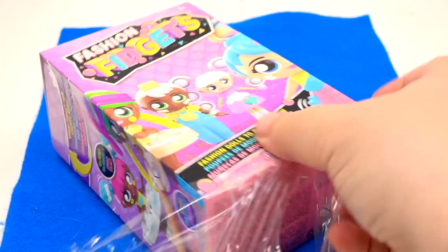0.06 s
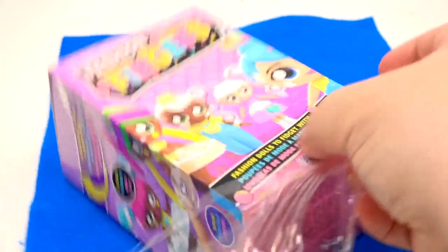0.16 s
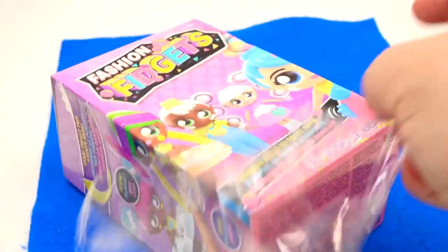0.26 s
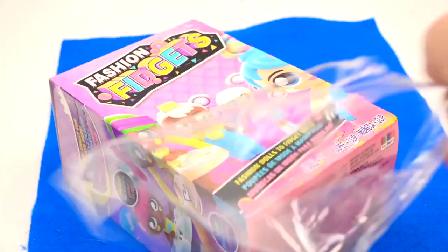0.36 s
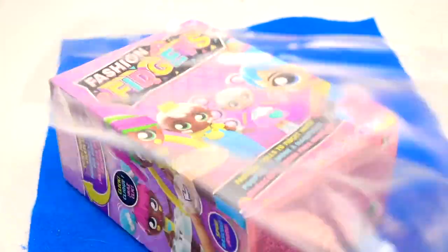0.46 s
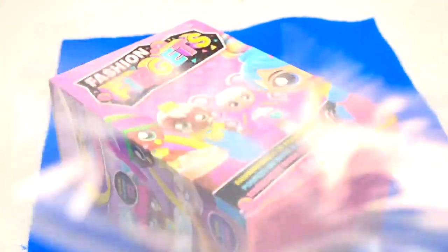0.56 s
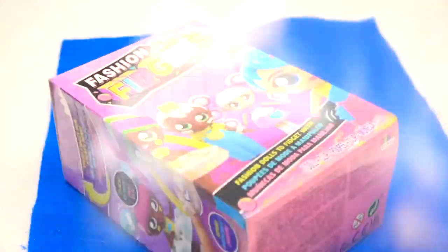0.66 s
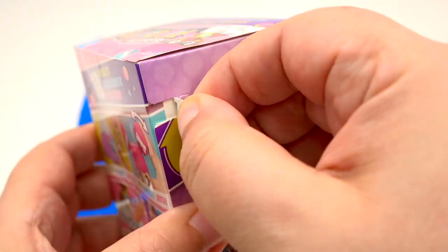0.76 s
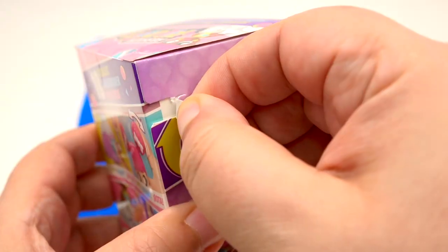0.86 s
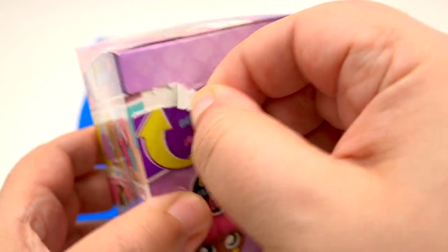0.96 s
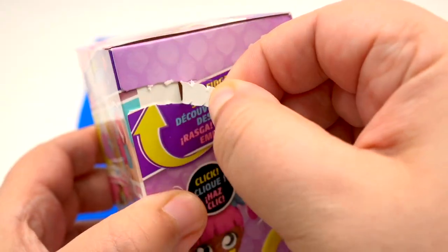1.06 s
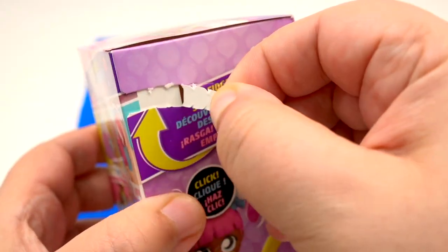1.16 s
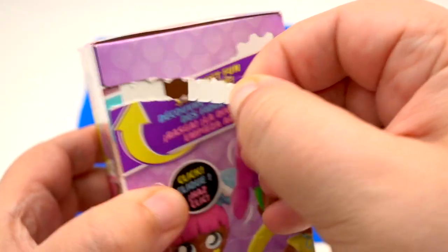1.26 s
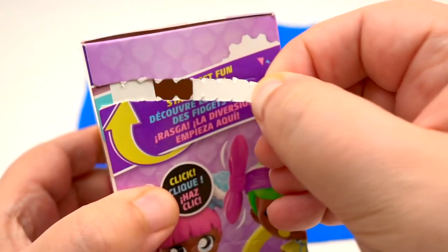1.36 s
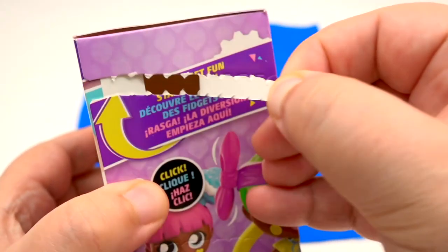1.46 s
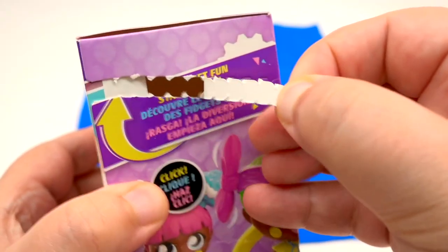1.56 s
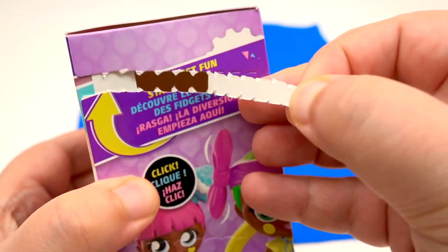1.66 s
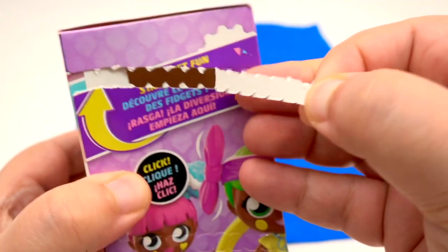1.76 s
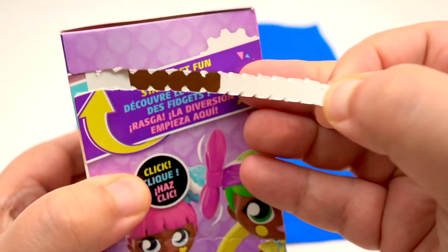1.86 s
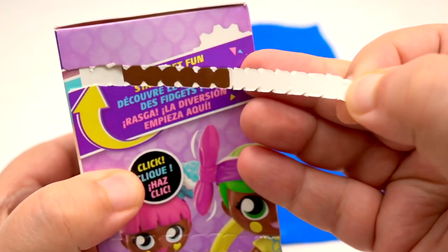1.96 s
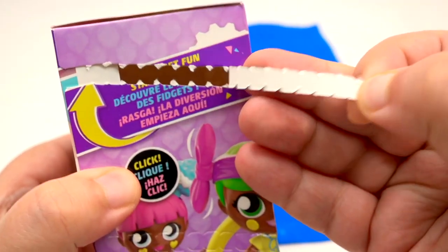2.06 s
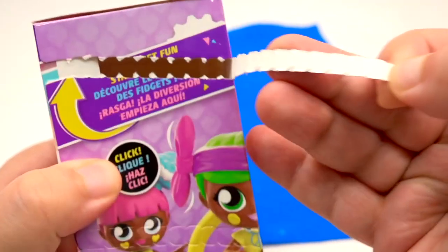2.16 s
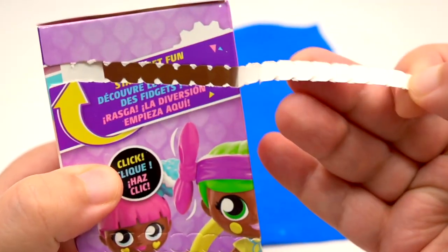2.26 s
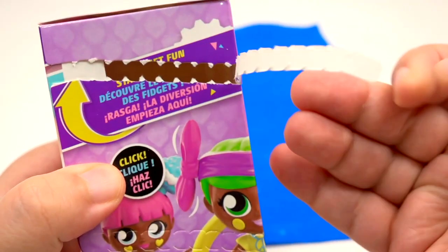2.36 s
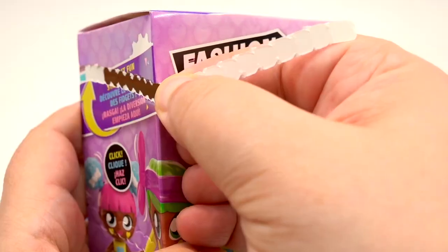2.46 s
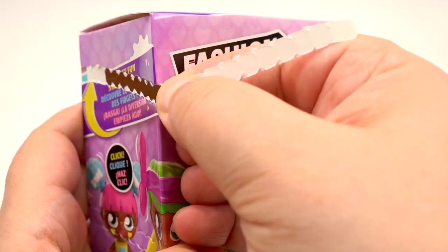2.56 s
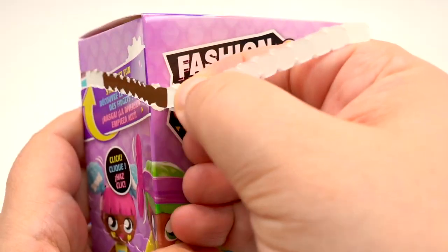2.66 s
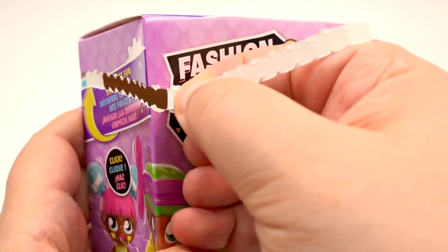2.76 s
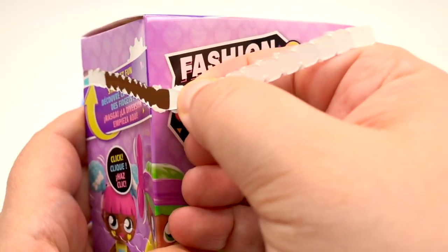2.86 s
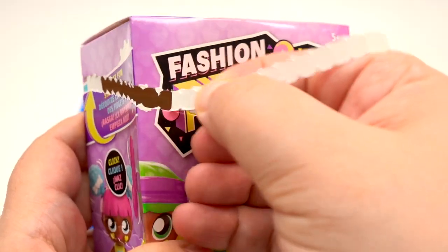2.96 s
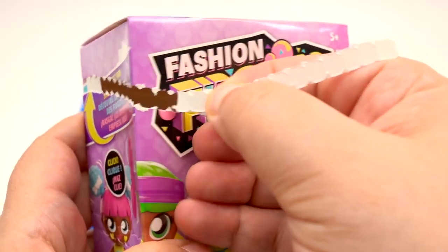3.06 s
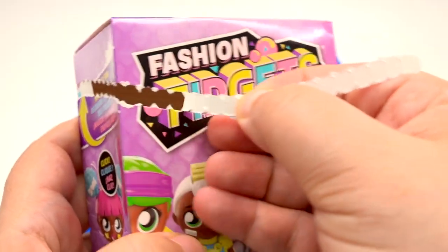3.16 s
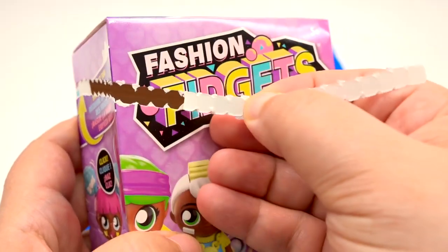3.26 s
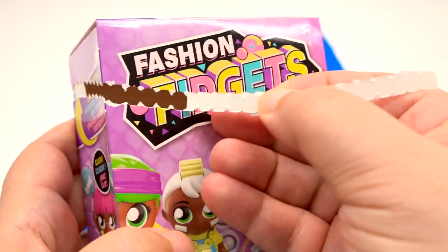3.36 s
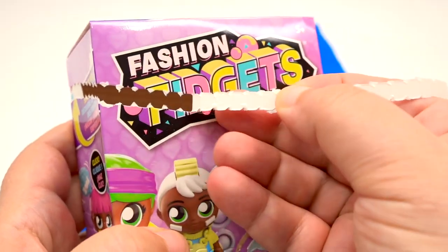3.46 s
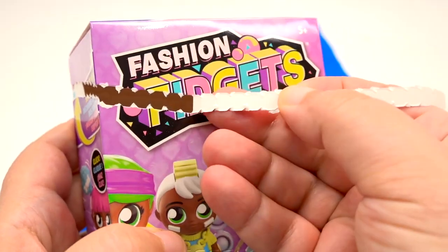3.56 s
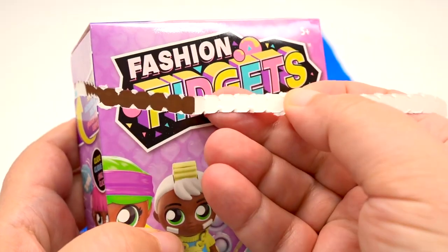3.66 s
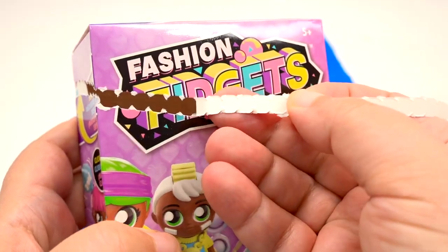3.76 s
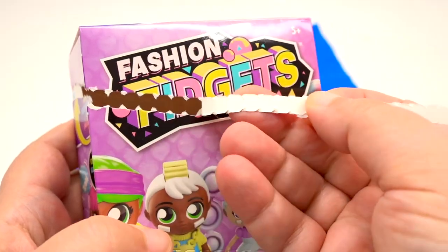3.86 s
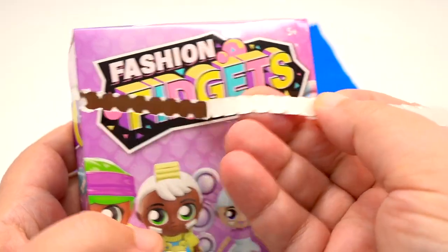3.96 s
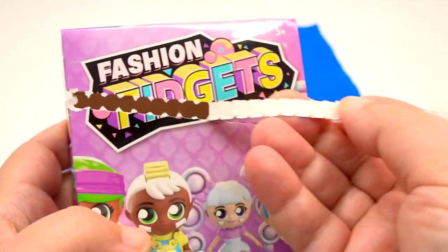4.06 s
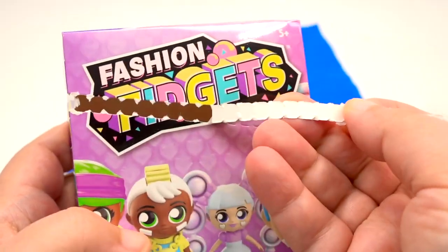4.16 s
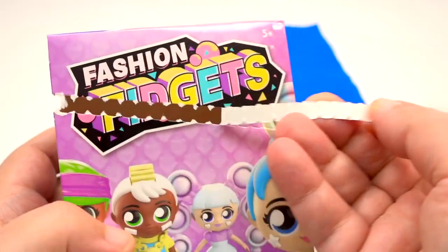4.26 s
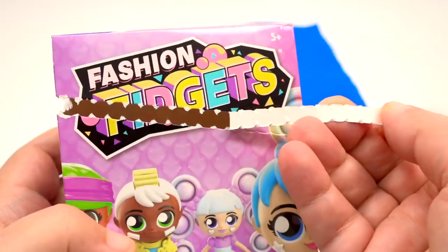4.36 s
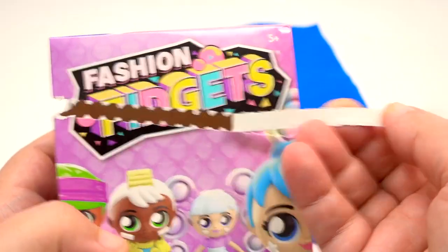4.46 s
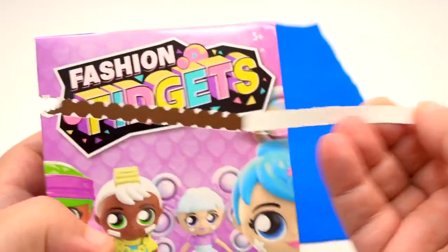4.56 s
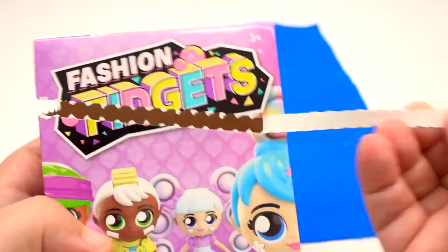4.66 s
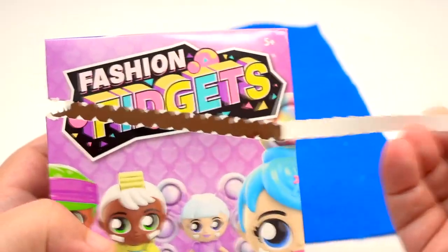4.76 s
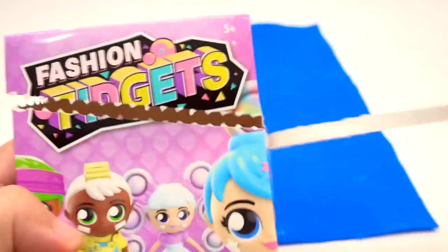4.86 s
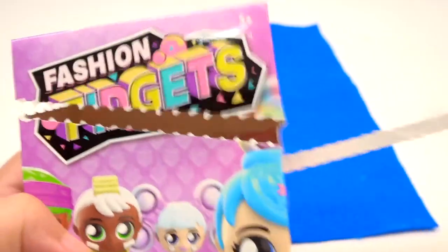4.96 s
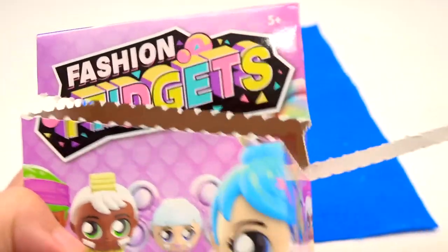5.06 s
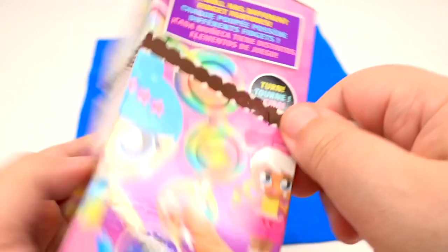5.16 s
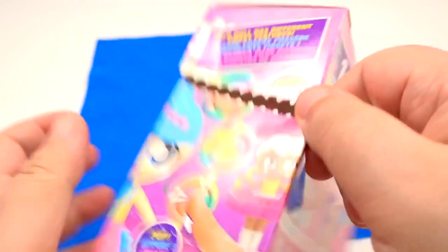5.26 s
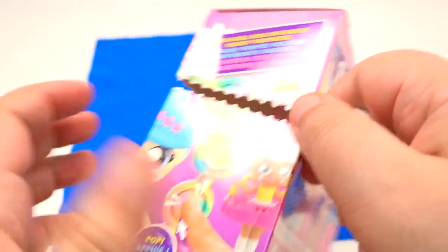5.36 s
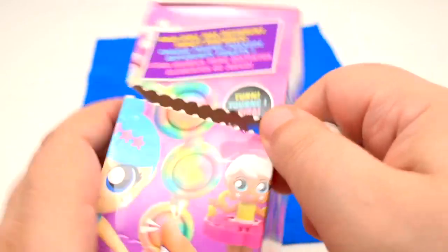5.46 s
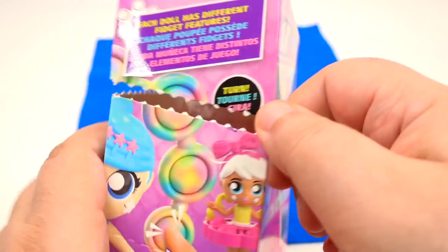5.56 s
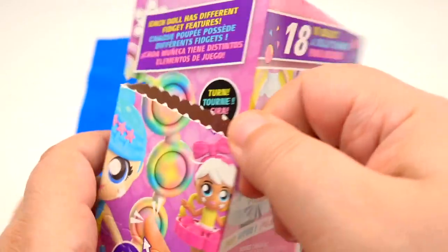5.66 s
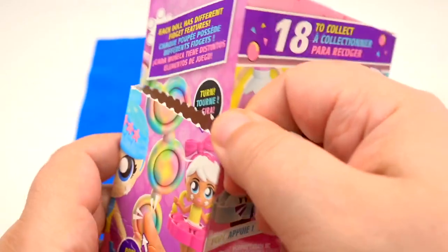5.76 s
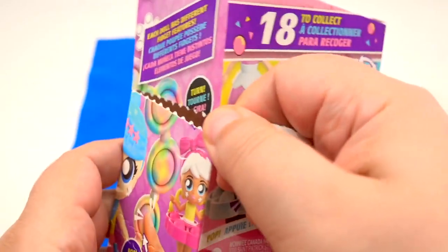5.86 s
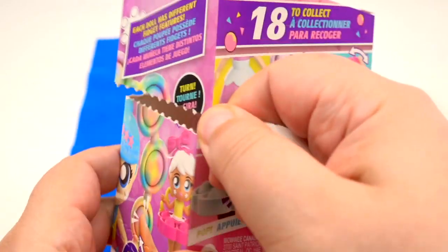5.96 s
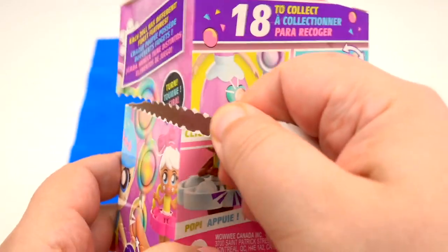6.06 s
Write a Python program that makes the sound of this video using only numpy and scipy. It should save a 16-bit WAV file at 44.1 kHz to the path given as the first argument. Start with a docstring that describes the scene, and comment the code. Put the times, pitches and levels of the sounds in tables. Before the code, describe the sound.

Heard up close in a small room, hands tug crackly plastic film off a little cardboard box and pull its tear strip. The perforations break one by one with dry, hollow snaps, pause, rip through a corner, then carry on and speed up in a final burst. A dull knock from the loosened lid, light scraping and a few last snaps follow, over faint handling noise.

```python
"""A perforated tear strip is peeled off a small cardboard box, close up, after its thin plastic wrap.
Each paper bridge breaks with a crack that rings the card walls and the hollow inside, the more so
where the card gives; fibres crackle in between. The last stretch goes in one quick run, and the loose
top knocks and is bent open. A small room answers, and a limiter flattens the loudest cracks."""
import sys
import numpy as np
from scipy import signal
from scipy.fft import rfft, irfft, next_fast_len
from scipy.io import wavfile
from scipy.ndimage import uniform_filter1d, minimum_filter1d, map_coordinates

SR = 44100
rng = np.random.default_rng(int(sys.argv[2]) if len(sys.argv) > 2 else 0)


def unload_audio(sound):
    """Save the sound as a 16-bit wav file, at the path given as the first command line argument."""
    columns = np.transpose(np.atleast_2d(sound))
    # keep every value between -1 and 1, then stretch to whole-number steps
    steps = np.round(np.clip(columns, -1, 1) * 32767)
    wavfile.write(sys.argv[1], SR, steps.astype(np.int16))


N = 269892
TIME = np.arange(N) / SR
HIT_TIME = np.arange(SR // 5) / SR  # seconds into a single hit

# Tone curves. Each row: frequency in Hz, gain in dB.
ROOM_TONE_EQ = [(25, -45), (60, 2.5), (130, 5), (400, -10), (1000, -5), (3000, -32), (16000, -56)]
HANDS_EQ = [(40, -20.5), (90, -15), (130, 4), (180, -8), (330, -9), (900, -37), (3000, -41.5)]
FILM_EQ = [(59, -46), (229, -13.5), (524, -8.5), (1150, -6), (3800, -1.5), (5400, -0.5), (8500, -9),
           (13500, -21), (16000, -22)]
SOFT_TOUCH_EQ = [(500, 3.5), (1500, 1.5), (6000, -16), (16000, -40)]
CRACK_EQ = [(200, -12), (1000, -15), (1700, -12), (2400, -1), (4000, 5), (6000, 0.5), (8800, -3.5),
            (10800, -18), (16000, -22)]
FIBRE_EQ = [(80, -4), (300, 7.5), (900, 7.5), (5000, -2), (8500, -8.5), (10800, -16), (16000, -22)]
CORNER_EQ = [(100, -29), (300, 6.5), (700, -2), (2300, 2.5), (8800, -8.5), (11000, -26), (16000, -24)]
PLIES_EQ = [(200, -5.5), (1500, 3.5), (3000, -8), (5300, -1), (9000, -12.5), (11000, -19), (16000, -27)]
REVERB_EQ = [(60, -14.5), (200, -6.5), (900, -7.5), (3000, -5), (12000, -5.5)]
STEREO_SIDE_EQ = [(40, -26), (200, -16), (1200, -29), (3600, -47), (5800, -21.5), (8200, -2), (10000, 1),
                  (14000, -15)]

# Tugs that slide the wrap off. Each row: start and end in seconds, crinkle level in dB.
WRAP_TUGS = [(0.038, 0.05, -25.5), (0.1, 0.14, -38), (0.18, 0.47, -32), (0.393, 0.413, -26),
             (0.622, 0.648, -24.5)]
# The wrap buckling. Each row: time in seconds, level in dB.
WRAP_POPS = [(0.0246, -12), (0.041, -8), (0.0981, -19), (0.1698, -12.5), (0.2426, -9), (0.297, -11),
             (0.461, -25), (0.484, -8.5), (0.604, -8), (0.618, -3.5), (0.6345, -3), (0.718, -16)]
# Fingers bumping the box. Each row: time in seconds, level in dB.
FINGER_BUMPS = [(0.172, -34), (0.604, -24), (2.143, -20.5), (2.3049, -29), (4.696, -18.5), (5.654, -22.5)]
# Bridges breaking and creases giving way. Each row: time in seconds, crack, hollow and wall levels in dB.
CARD_SNAPS = [(0.797, -16.5, -40, -19.5), (0.909, -19, -25, -12), (0.9502, -13.5, -17.5, -17),
              (1.146, -31, -40, -32), (1.1951, -13.5, -18, -15.5), (1.2609, -14, -20, -18.5),
              (1.4162, -16.5, -12, -10), (1.4287, -18.5, -25, -20), (1.5672, -12, -14, -17.5),
              (1.7161, -14, -15, -9), (1.8445, -26.5, -38, -37), (1.8826, -13, -18, -9.5),
              (1.9883, -22, -45, -31), (2.042, -14.5, -12, -12), (2.055, -15, -15, -12),
              (2.0899, -17, -10, -13.5), (2.1027, -16, -10.5, -17), (2.87, -34.5, -42, -32),
              (2.916, -23, -40, -16.5), (2.9298, -13, -24, -12.5), (3.021, -16, -24.5, -20),
              (3.055, -18, -39, -11.5), (3.0629, -21.5, -38, -22), (3.1364, -11, -15.5, -6),
              (3.1928, -22.5, -34, -22), (3.288, -13, -18.5, -5.5), (3.375, -16, -25, -11),
              (3.745, -18.5, -21, -15.5), (3.775, -12.5, -8, -9), (3.9515, -15.5, -14, -14),
              (3.9782, -14.5, -16.5, -17), (3.997, -16, -9, -15.5), (4.167, -20.5, -20, -11),
              (4.1814, -21, -12, -16), (4.2105, -16.5, -37, -20), (4.2291, -18.5, -16, -12),
              (4.3073, -17, -21.5, -15), (4.468, -16.5, -18, -7.5), (4.5114, -25, -14.5, -18),
              (4.5214, -19, -13, -7), (4.5639, -12, -14.5, -5), (4.622, -20.5, -16, -13.5),
              (4.65, -17.5, -37, -16), (4.7331, -17.5, -11, -8.5), (4.767, -19.5, -17.5, -21),
              (4.782, -14.5, -14.5, -10), (4.799, -17, -19, -13), (4.807, -18, -26, -2.5),
              (4.821, -17, -11.5, -9), (4.854, -19, -6, -3.5), (4.866, -12.5, -8, -3.5),
              (4.885, -26, -7, -8), (4.912, -13.5, -14, -6), (4.923, -20, -15, -7),
              (4.935, -15, -15.5, -5.5), (5.9286, -19, -27, -18), (5.9785, -10.5, -26, -11.5),
              (6.055, -18, -43, -16.5)]
# Short rips and scrapes. Each row: peak time in seconds, level in dB, decay in seconds.
CARD_RIPS = [(0.942, -27, 0.005), (3.753, -31, 0.012), (5.114, -38.5, 0.053), (5.476, -29, 0.035),
             (5.677, -40.5, 0.027), (6.044, -29, 0.0083)]
# Steady pulls on the card. Each row: start and end in seconds, crackle level in dB.
CARD_PULLS = [(1.2, 2.1, -48), (3.55, 4.95, -54.5), (5.5, 6.1, -57)]

# The box rings higher near a corner, lower mid-face. Each row: time in seconds, hollow and wall pitch in Hz.
BOX_PITCHES = [(2.055, 343, 890), (2.091, 446, 943), (3.38, 487, 886), (3.76, 256, 988), (4.2, 245, 1020),
               (4.3, 244, 893), (4.47, 250, 900), (4.548, 298, 760), (4.73, 317, 995), (4.9, 287, 936),
               (5.7, 247, 1022)]
# The hollow and the stiffer walls. Each row: multiple of the main pitch, level in dB, t60 in seconds.
HOLLOW_MODES = [(0.66, -7, 0.061), (1, -0.5, 0.059), (1.38, -6, 0.062), (1.85, -9, 0.03)]
WALL_MODES = [(0.85, -7.5, 0.042), (1, 0, 0.042), (1.12, -7.5, 0.028), (1.38, -7, 0.025),
              (1.52, -3.5, 0.039), (1.78, -2.5, 0.017)]
# The loose strip and the loose top. Each row: frequency in Hz, level in dB, t60 in seconds.
STRIP_MODES = [(1670, -4.9, 0.014), (2340, 2.5, 0.016), (3290, -0.5, 0.016)]
LID_MODES = [(248, -4.5, 0.057), (404, -0.5, 0.038), (490, 2, 0.026), (617, -5, 0.022), (878, -2, 0.021)]
# The room's tail. Each row: frequency in Hz, t60 in seconds.
ROOM_DECAY = [(1000, 0.26), (7000, 0.28)]
# Stereo balance. Each row: frequency in Hz, left minus right in dB.
LEFT_LEAN = [(600, 2), (1200, -0.3), (8000, 0.6)]


def amp(db):
    """Decibels to linear gain."""
    return 10 ** (np.asarray(db) / 20)


def unit(x):
    """Scale to an rms of 1."""
    return x / np.sqrt(np.mean(x ** 2) + 1e-20)


def burst(x):
    """Scale a hit to the energy of one millisecond at full level."""
    return x * np.sqrt(SR / 1000 / np.sum(x ** 2))


def along(points, hz):
    """Read a curve of (Hz, value) points on a log frequency axis."""
    freqs, values = np.transpose(points)
    return np.interp(np.log(hz + 1), np.log(freqs + 1), values)


def add(track, s, sound):
    """Mix a sound into a track at s seconds."""
    part = track[max(round(s * SR), 0):][:len(sound)]
    part += sound[:len(part)]


def colour(x, eq):
    """Minimum-phase EQ: nothing rings ahead of an attack."""
    size = 2 * next_fast_len(len(x) // 2 + 2048)
    gain = amp(along(eq, np.fft.rfftfreq(size, 1 / SR)))
    cepstrum = irfft(np.log(gain))
    cepstrum[1:size // 2] *= 2
    cepstrum[size // 2 + 1:] = 0
    return irfft(rfft(x, size) * np.exp(rfft(cepstrum)), size)[:len(x)]


def wobble(rate):
    """A smooth random curve, rate knots a second."""
    return map_coordinates(rng.standard_normal(2048), [TIME * rate], mode="mirror")


def strokes(rows, attack, release):
    """Envelope of hand movements: each swells, holds from start to end and dies away."""
    envelope = np.zeros(N)
    for start, end, db in rows:
        fade = np.maximum((start - TIME) / attack, (TIME - end) / release)
        envelope += amp(db) * np.exp(-np.maximum(0, fade))
    return envelope


def grains(eq, rate, spread_db):
    """Tiny fractures of uneven size at random times, about rate a second."""
    sizes = amp(spread_db * np.clip(rng.standard_normal(N), -2, 2)) * rng.choice([-1, 1], N)
    return unit(colour(sizes * (rng.random(N) < rate / SR), eq))


def background(room_db=-53, hands_db=-51, lift_s=0.76, resting_db=-9):
    """Steady room tone, and the low shuffle of hands, stronger once they lift the box."""
    room_tone = unit(colour(rng.standard_normal(N), ROOM_TONE_EQ))
    shuffle = unit(colour(rng.standard_normal(N), HANDS_EQ))
    fidget = amp(3 * wobble(11))
    held = amp(np.interp(TIME, [lift_s / 2, lift_s], [resting_db, 0]))
    return amp(room_db) * room_tone + amp(hands_db) * held * fidget * shuffle


def crack(eq, t60, ragged_db):
    """A quick avalanche of fractures that speeds up and stalls within a millisecond."""
    surges = map_coordinates(rng.standard_normal(len(HIT_TIME) // 8), [HIT_TIME * 1500], order=1)
    envelope = amp(ragged_db * surges - 60 * HIT_TIME / t60)
    return burst(colour(rng.standard_normal(len(HIT_TIME)) * envelope, eq))


def plastic_wrap(crinkle_db=-2, pop_db=-6):
    """The film crinkles finely with each tug and now and then buckles with a sharp pop."""
    tugs = strokes(WRAP_TUGS, attack=0.014, release=0.033)
    crinkle = amp(2.6 * wobble(200)) * grains(FILM_EQ, rate=3000, spread_db=5.5)
    out = tugs * amp(crinkle_db) * crinkle
    for s, db in WRAP_POPS:
        add(out, s, amp(db + pop_db) * crack(FILM_EQ, t60=0.023, ragged_db=0.5))
    return out


def flex(x, depth_db):
    """A bending sheet keeps changing colour: gains drift over frequency and time."""
    frames = signal.stft(x, nperseg=256)[2]
    drift = uniform_filter1d(rng.standard_normal(frames.shape), size=6, axis=0)
    drift = uniform_filter1d(drift, size=14, axis=1)
    gain = amp(depth_db * unit(drift))
    gain /= np.sqrt(np.mean(gain ** 2, axis=0))
    return signal.istft(frames * gain, nperseg=256)[1][:N]


def ring(modes, base_hz=1, detune=0.02, scatter_db=4.0):
    """Struck card rings in decaying modes whose pitch and strength vary from hit to hit."""
    ratio, db, t60 = np.transpose(modes)[:, :, None]
    hz = base_hz * ratio
    shift, strength = rng.standard_normal((2, len(modes), 1))
    sign = rng.choice([-1, 1], (len(modes), 1))
    waves = sign * np.sin(2 * np.pi * hz * np.exp(detune * shift) * HIT_TIME)
    envelopes = amp(db + scatter_db * strength - 60 * HIT_TIME / t60)
    motion = np.sum(waves / hz * envelopes, axis=0)
    return burst(np.diff(motion, prepend=0))  # a small box radiates only its changes: no deep bass


def box(s, hollow_db, wall_db):
    """Hollow and walls ring at the pitches that the tear and the grip give them at s seconds."""
    times, hollow_hz, wall_hz = np.transpose(BOX_PITCHES)
    hollow = ring(HOLLOW_MODES, np.interp(s, times, hollow_hz), detune=0.035, scatter_db=3)
    walls = ring(WALL_MODES, np.interp(s, times, wall_hz), detune=0.02, scatter_db=3)
    return amp(hollow_db) * hollow + amp(wall_db) * walls


def finger_bumps():
    """A soft fingertip rings the hollow and, more faintly, the walls, with no crack."""
    out = np.zeros(N)
    for s, db in FINGER_BUMPS:
        add(out, s, box(s, hollow_db=db, wall_db=db - 10))
    return colour(out, SOFT_TOUCH_EQ)


def bridge_snaps(crack_db=-2, strip_db=-6, slip_db=-16, slip_lead_s=0.0062, edge_db=-6, edge_lag_s=0.0035):
    """Each bridge slips, cracks on one edge of the strip, then the other, and the box springs back."""
    cracks, ringing = np.zeros((2, N))
    for s, db, hollow_db, wall_db in CARD_SNAPS:
        early, late = rng.uniform(0.55, 1, 2)
        slip = box(s, hollow_db + slip_db, wall_db) + amp(db) * ring(STRIP_MODES)
        add(ringing, s - slip_lead_s * early, amp(slip_db) * slip)
        add(ringing, s, box(s, hollow_db, wall_db))
        for at, level in [(s, db), (s + edge_lag_s * late, db + edge_db)]:
            add(cracks, at, amp(level + crack_db) * crack(CRACK_EQ, t60=0.011, ragged_db=2))
            add(ringing, at, amp(level + strip_db) * ring(STRIP_MODES, detune=0.14))
    return cracks, ringing


def fibres(idle_db=-58, rip_rise_s=0.009, strain_s=0.004, fray_s=0.024, fray_db=-20):
    """Fibres part sparsely under a steady pull, and in swarms at each rip and around each snap."""
    swarms = sum(strokes([(s, s, db)], rip_rise_s, decay) for s, db, decay in CARD_RIPS)
    lead = HIT_TIME[-1] / 2
    strain_and_fray = np.exp(-np.maximum((lead - HIT_TIME) / strain_s, (HIT_TIME - lead) / fray_s))
    for s, db, *_ in CARD_SNAPS:
        add(swarms, s - lead, amp(db + fray_db) * strain_and_fray)
    pull = amp(idle_db) + strokes(CARD_PULLS, attack=0.037, release=0.035)
    pull *= amp(4.7 * wobble(30))
    sparse = grains(FIBRE_EQ, rate=900, spread_db=5)
    dense = grains(FIBRE_EQ, rate=3700, spread_db=-1.0)
    return swarms * dense + pull * sparse


def corner_rip(start=2.606, end=2.6166, db=-21):
    """At the corner the folded card rips through in one dense, crisp burst."""
    crunch = grains(CORNER_EQ, rate=6000, spread_db=3.5)
    return strokes([(start, end, db)], attack=0.0035, release=0.011) * crunch


def ply_peel(start=2.93, end=3.38, db=-38):
    """Past the corner the plies of the card part in a fine, surging crackle."""
    fizz = amp(3 * wobble(55)) * grains(PLIES_EQ, rate=5000, spread_db=4)
    return strokes([(start, end, db)], attack=0.017, release=0.022) * fizz


def lid_knock(s=5.2826, db=-2, tick_db=-23, settle_s=0.018, settle_db=-26):
    """The opened box is turned: its loose top knocks once, dull and short, and settles with a tick."""
    out = np.zeros(N)
    knock = ring(LID_MODES, detune=0.022, scatter_db=1.5)
    add(out, s, amp(db) * colour(knock, SOFT_TOUCH_EQ))
    for at, level in [(s, tick_db), (s + settle_s, settle_db)]:
        add(out, at, amp(level) * crack(CRACK_EQ, t60=0.02, ragged_db=1))
    return out


def diffuse(x, size, decay=None):
    """Refill each patch of time and frequency with noise; with a decay, its energy lingers."""
    hz, t, frames = signal.stft(x, SR, nperseg=size)
    power = abs(frames) ** 2
    if decay:
        fade = amp(-120 * t[:SR // size] / along(decay, hz)[:, None])  # power falls 60 dB per t60
        fade[:, :3] = 0  # pre-delay
        fade /= fade.sum(axis=1, keepdims=True)
        power = abs(signal.fftconvolve(power, fade, axes=1))[:, :len(t)]
    noise = signal.stft(rng.standard_normal(N), nperseg=size)[2]
    return signal.istft(np.sqrt(power) * noise / noise.std(), nperseg=size)[1][:N]


def room(x, tail_count=16, wash_share=0.7):
    """A small room: ringing reflections whose colour varies at random over time, and a diffuse wash."""
    reflections = np.zeros(N)
    for piece in np.array_split(np.arange(N), tail_count):
        hz, t, noise = signal.stft(rng.standard_normal(SR // 2), SR, nperseg=256)
        fade = amp(-60 * t / along(ROOM_DECAY, hz)[:, None])
        tail = signal.istft(noise * fade, SR, nperseg=256)[1]
        tail[:SR // 140] = 0  # 7 ms pre-delay
        add(reflections, piece[0] / SR, signal.fftconvolve(x[piece], tail / np.linalg.norm(tail)))
    wash = diffuse(x, size=256, decay=ROOM_DECAY)
    return colour(np.sqrt(1 - wash_share) * reflections + np.sqrt(wash_share) * wash, REVERB_EQ)


def stereo_image(x):
    """Nearly mono and leaning left, wide only in the high treble."""
    side = colour(diffuse(x, size=128), STEREO_SIDE_EQ)
    left = colour(x + side, [(hz, db / 2) for hz, db in LEFT_LEAN])
    right = colour(x - side, [(hz, -db / 2) for hz, db in LEFT_LEAN])
    return np.array([left, right])


def scene(dry_send_db=-7):
    """Wrap, strip and box in the room; the corner rip and the lid knock have less room echo."""
    low_cut = signal.butter(1, 110, "high", fs=SR)
    cracks, ringing = bridge_snaps()
    sheets = flex(plastic_wrap() + cracks + fibres() + ply_peel(), depth_db=1.6)
    direct = sheets + signal.lfilter(*low_cut, ringing + finger_bumps())
    drier = corner_rip() + signal.lfilter(*low_cut, lid_knock())
    reverb = room(direct + amp(dry_send_db) * drier)
    return stereo_image(direct + drier + reverb + background())


def record(dry, ceiling_db=-7.0, hold_s=0.0025, top_hz=16100):
    """A fast limiter ducks each loud crack, then a brick-wall low-pass trims the top."""
    needed = np.minimum(1, amp(ceiling_db) / (abs(dry).max(axis=0) + 1e-9))
    span = 2 * max(int(hold_s * SR / 2), 1) + 1
    held = minimum_filter1d(needed, span, origin=span // 3)
    gain = uniform_filter1d(held, span // 3)
    size = next_fast_len(N + SR // 2)
    passband = np.fft.rfftfreq(size, 1 / SR) < top_hz
    return irfft(rfft(dry * gain, size) * passband, size)[:, :N]


dry = scene()
out = record(dry)
unload_audio(out)
```